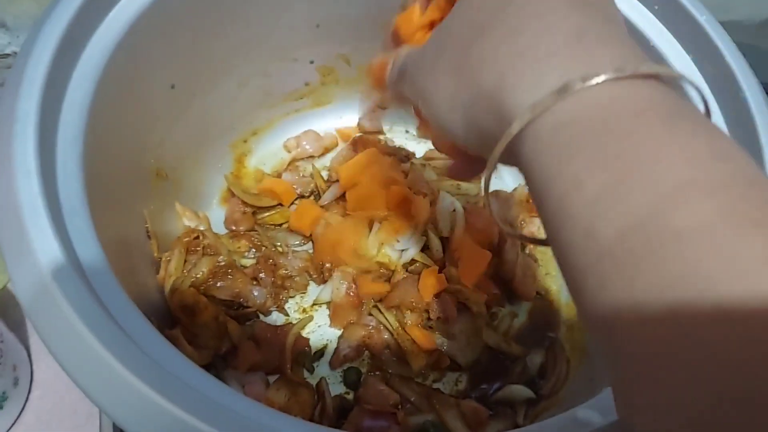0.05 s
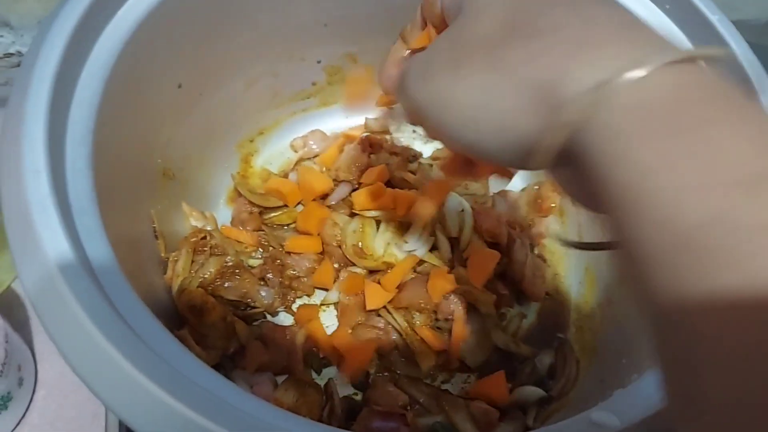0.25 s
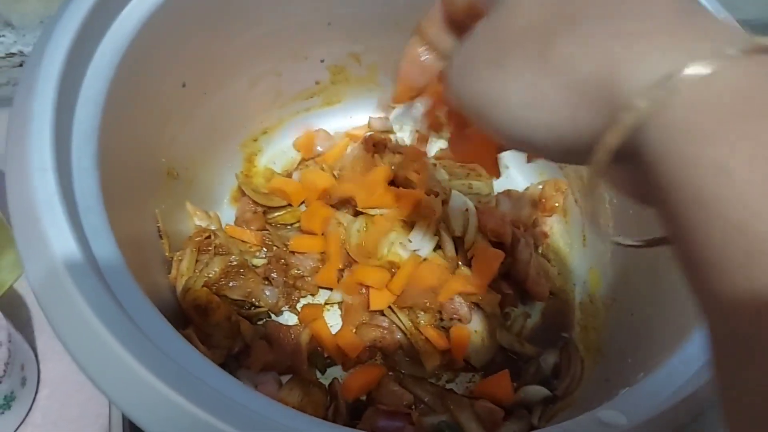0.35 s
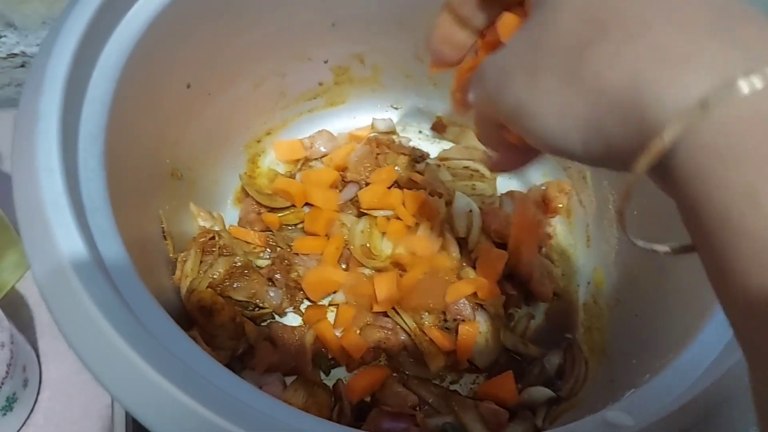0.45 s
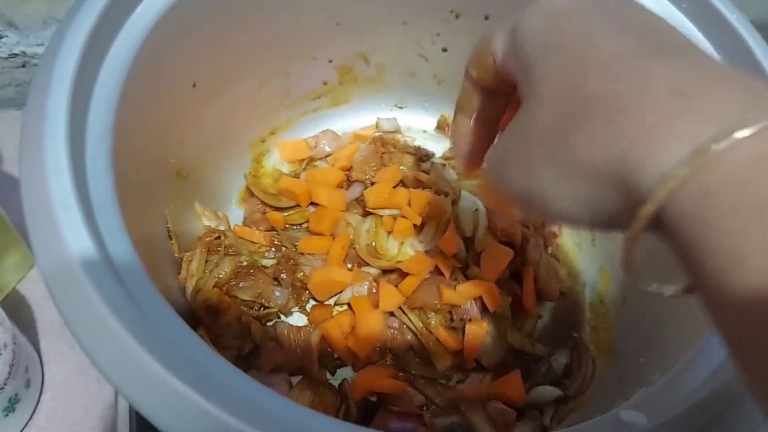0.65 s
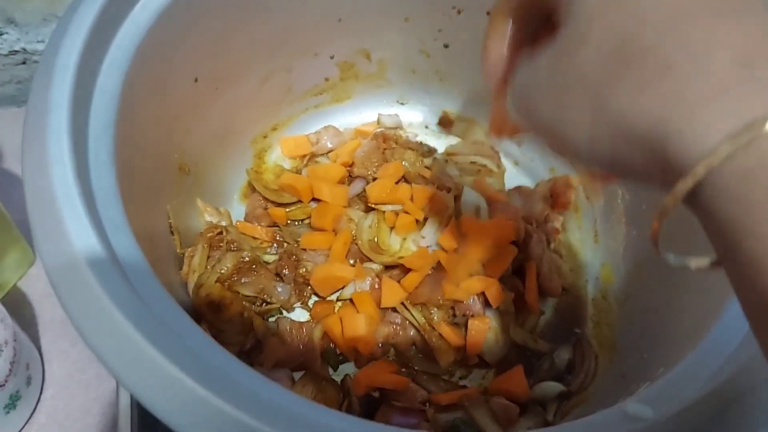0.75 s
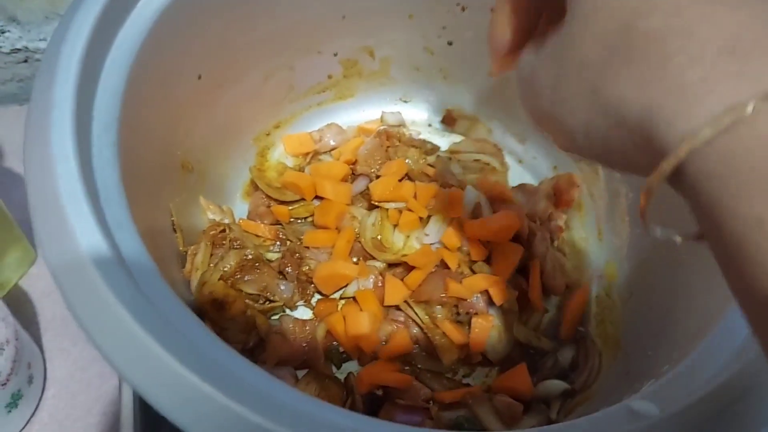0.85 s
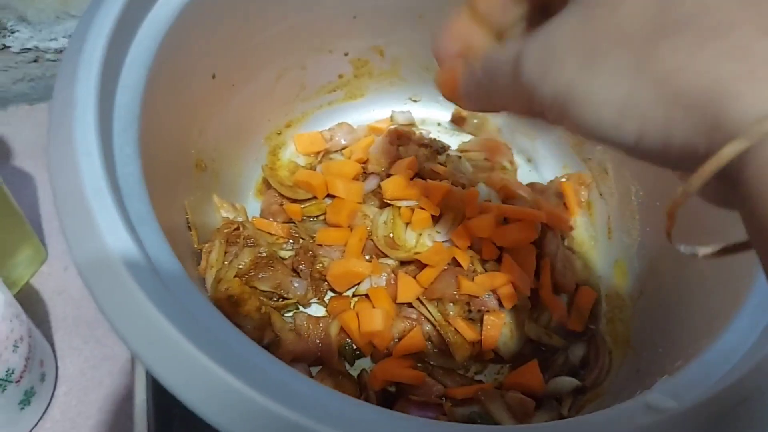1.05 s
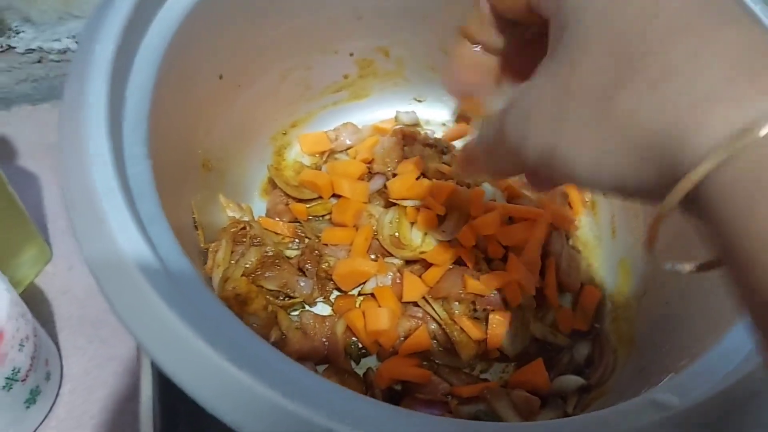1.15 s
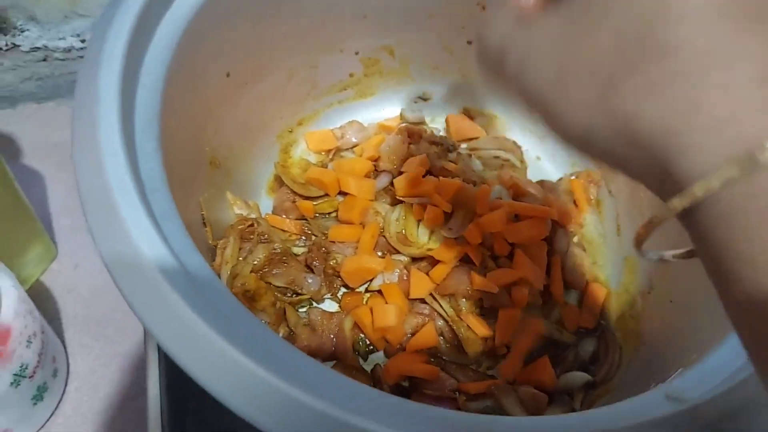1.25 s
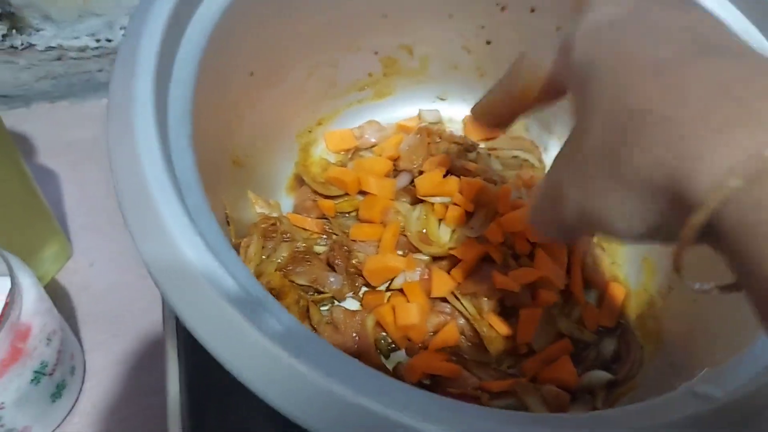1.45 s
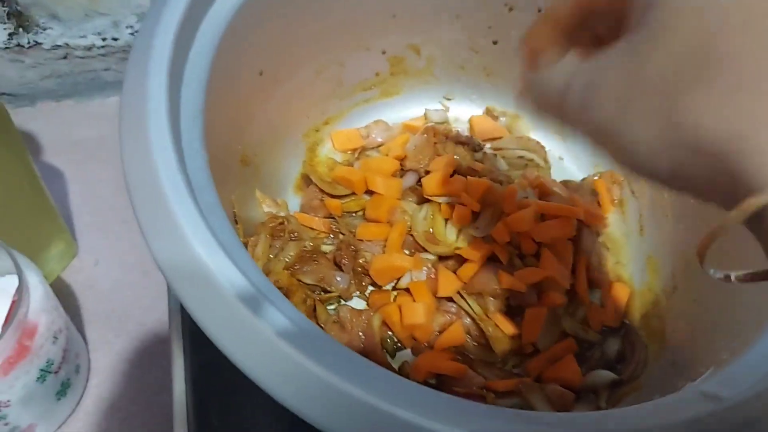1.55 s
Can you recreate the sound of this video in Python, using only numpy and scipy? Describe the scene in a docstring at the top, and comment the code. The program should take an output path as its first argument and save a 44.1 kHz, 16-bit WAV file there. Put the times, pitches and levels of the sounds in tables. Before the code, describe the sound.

Dull, damp thuds and taps come in quick clusters as carrot pieces drop into a metal cooking pot, heard from just above. Faint wet crackle and a low kitchen hum lie underneath, and a thin bangle clink follows.

```python
"""Carrot pieces fall from a hand onto onions and meat in a metal cooking pot, in a small kitchen. Each landing
is a dull thud of the pile and pot floor that rings the pot wall, with a wet smack on top. The damp pieces
crackle and tick in the fingers, tiny wet bubbles pop with a squeak, and two thin pings sound among the
landings. A thin bangle clinks once against the pot at the end; a motor hums in the background throughout."""
import sys
import numpy as np
from scipy import signal
from scipy.fft import rfft, irfft
from scipy.io import wavfile
from scipy.ndimage import uniform_filter1d

SR = 44100
rng = np.random.default_rng(int(sys.argv[2]) if len(sys.argv) > 2 else 0)


def materialize(psi):
    """Save the field psi as 16-bit PCM at rate SR to the path in sys.argv[1].

    A 1-D psi becomes a single channel; in a 2-D psi each row is a channel.
    """
    bounded = np.clip(np.atleast_2d(psi).T, -1, 1)
    quanta = np.round(bounded * 32767).astype(np.int16)
    wavfile.write(sys.argv[1], SR, quanta)


N = 70560
T = np.arange(N) / SR
HZ = np.maximum(np.fft.rfftfreq(N, 1 / SR), 1)


def from_db(db):
    """Decibels to gain."""
    return 10 ** (np.asarray(db) / 20)


def rms_one(x):
    """Scale to unit rms."""
    return x / np.sqrt(np.mean(x ** 2) + 1e-20)


def pan(db):
    """Left and right gains; positive dB leans left."""
    return from_db([[db / 2], [-db / 2]])


def over_hz(points):
    """A curve of straight lines over log frequency."""
    hz, value = np.transpose(points)
    return np.interp(np.log(HZ), np.log(hz), value)


def eq(points):
    """Gain at each frequency along an EQ curve."""
    return from_db(over_hz(points))


def fader(points):
    """Gain at each moment along a level ride."""
    return from_db(np.interp(T, *np.transpose(points)))


def decay(start, t60):
    """An envelope that jumps to 1 and dies away."""
    return (T >= start) * from_db(-60 * np.clip((T - start) / t60, 0, 10))


def noise(colour):
    """Coloured mono noise of unit rms."""
    return rms_one(irfft(rfft(rng.standard_normal(N)) * colour, N))


def drift(rate_hz):
    """A random wobble, rolled off above the given rate."""
    return noise(1 / (1 + (HZ / rate_hz) ** 4))


def convolve(x, response):
    """Play a sound through an impulse response."""
    return signal.fftconvolve(np.atleast_2d(x), np.atleast_2d(response), axes=1)[:, :N]


# Stereo image of diffuse sound: (frequency [Hz], left-right correlation [-1 to 1])
STEREO_IMAGE = [(30, -0.11), (80, 0.65), (160, .9), (330, .8), (550, 0.44), (1000, -0.52), (3000, 0.11),
                (15000, -0.75)]

def stereo_noise(colour):
    """Diffuse noise, narrow in the upper bass and low mids, wide in the treble."""
    mid, side = rfft(rng.standard_normal((2, N))) * colour
    alike = over_hz(STEREO_IMAGE)
    return rms_one(irfft(np.sqrt(1 + alike) * mid + np.sqrt(1 - alike) * side * [[1], [-1]], N))


# Level ride of the motor: (time [s], level [dB])
HUM_RIDE = [(0.0, -58), (0.056, -51), (0.132, -57.5), (0.298, -51), (0.346, -59.5), (0.426, -53),
            (0.958, -58.5), (1.202, -51.5), (1.488, -60), (1.6, -53.5)]

def motor_hum(hz=160.6, waver_hz=1.85):
    """A motor drones on one low tone that wavers in pitch and level."""
    phase = 2 * np.pi * np.cumsum(hz + waver_hz * drift(13)) / SR
    return pan(-1.7) * np.sqrt(2) * fader(HUM_RIDE) * np.sin(phase)


# Colour of the room tone: (frequency [Hz], relative level [dB])
ROOM_TONE_EQ = [(25, -10.5), (50, -5), (85, -0.5), (125, 1), (220, -7), (450, -8), (1000, -23),
                (1800, -37.5), (3200, -34.5), (6000, -34), (10000, -44), (15500, -43)]

def room_tone():
    """A steady, bass-heavy bed of noise."""
    return from_db(-58) * stereo_noise(eq(ROOM_TONE_EQ))


# Colour of the damp crackle: (frequency [Hz], relative level [dB])
CRACKLE_EQ = [(1800, -3.5), (3600, -3), (5500, -11), (7500, -5), (10000, -12), (12000, -10), (15500, -2)]
# Level ride of the crackle: (time [s], level [dB])
CRACKLE_RIDE = [(0, -67.5), (.13, -73.5), (.27, -66.5), (.42, -69), (.58, -65.5), (.7, -78), (.92, -79.5),
                (1.0, -72.5), (1.08, -75), (1.3, -78.5), (1.6, -83.5)]

def crackle(grains_per_s=700, spread_db=3.5, t60=.015):
    """Damp pieces crackle in the fingers: a fine spray of tiny noise grains."""
    onsets = rng.random(N) < grains_per_s / SR
    strengths = from_db(spread_db * np.minimum(rng.exponential(1, N), 4))
    envelope = rms_one(convolve(onsets * strengths, decay(0, t60))[0])
    return noise(eq(CRACKLE_EQ)) * envelope * fader(CRACKLE_RIDE)


def strike_db(hz, thump_db, knock_db):
    """How hard a landing drives a mode: the lows take its thump level, the highs its knock level."""
    crossfade = np.interp(np.log(hz), np.log([548, 1026]), [0, 1])
    return (1 - crossfade) * thump_db + crossfade * knock_db


def body_band(x):
    """Pile and pot radiate neither deep bass nor treble."""
    return signal.sosfilt(signal.butter(2, [235, 1675], "band", fs=SR, output="sos"), x + 1e-18)


MODE_SPREAD_DB = 1.5  # random change in a mode's level from hit to hit
# Carrot hits, also cueing the wall ring and the smacks:
# (time [s], thump level [dB], knock level [dB], smack level [dB], knock pitch [ratio])
HITS = [(0.041, -30, -52.5, -58.5, 0.94), (0.17, -50, -52, -59.5, 0.97), (0.2293, -16, -12.5, -41, 1.015),
        (.249, -32, -35, -67, 1.07), (0.262, -31.5, -34, -72, 1.01), (0.2862, -30.5, -37, -57.5, 1.05),
        (.296, -36.5, -33.5, -63, 1), (.321, -46.5, -36.5, -64, 1.053), (0.387, -37, -43, -53.5, 1.072),
        (0.445, -38, -52.5, -66, 0.97), (0.508, -40, -37, -62, 1.036), (.531, -47.5, -45.5, -47, 1.14),
        (0.5467, -42.5, -37, -61, 1.02), (0.631, -41.5, -51, -63, 0.97),
        (0.7623, -29.5, -36.5, -52.5, 1.08), (0.7803, -32, -34, -60, 1.03), (.796, -44, -53.5, -58, 1.04),
        (.858, -49.5, -51.5, -60.5, 1), (0.9735, -44, -56, -58.5, 1.01), (.986, -47, -51.5, -63.5, 0.97),
        (1.151, -22, -38, -46.5, 0.892), (1.175, -33.5, -50, -67, 0.91), (1.217, -48, -58, -82, 0.91),
        (1.2633, -29.5, -31, -51, 1.026), (1.281, -38, -55, -59.5, 0.97), (1.3363, -38.5, -40.5, -55, 1.01),
        (1.4107, -49, -45.5, -69, 0.98)]
# Damped modes of pile and pot floor: (frequency at pitch 1 [Hz], relative level [dB], t60 [s])
KNOCK_MODES = [(274, -19.5, 0.084), (382.7, -9, 0.045), (450.6, -2, 0.046), (532, -2.5, 0.041),
               (712, 0.5, .018), (1032, 0, 0.024), (1530, -11, 0.015), (1666, -10.5, 0.014)]

def knocks(length_s=.2, echo_delay_s=.004, echo_t60=.16, echo_db=-6.5):
    """Each piece lands on its own spot, with its own pitch; returns the knocks and their in-pot echo."""
    t = T[T < length_s]
    hz, db, t60 = np.transpose(KNOCK_MODES)[:, :, None]
    signs = (-1) ** np.arange(len(hz))[:, None]
    direct, echo = np.zeros(N + len(t)), np.zeros((2, N + len(t)))
    for s, thump_db, knock_db, _, pitch in HITS:
        scatter_db = MODE_SPREAD_DB * rng.standard_normal(hz.shape)
        gains = signs * from_db(db - .5 + strike_db(hz, thump_db, knock_db) + scatter_db)
        knock = np.sum(gains * from_db(-60 * t / t60) * np.cos(2 * np.pi * hz * pitch * t), axis=0)
        walls = rng.standard_normal(len(t)) + rng.standard_normal((2, len(t)))  # centre plus width
        walls = rms_one(walls * (t >= echo_delay_s) * from_db(-60 * t / echo_t60)) / np.sqrt(len(t))
        span = slice(int(s * SR), int(s * SR) + len(t))
        direct[span] += knock
        echo[:, span] += convolve(knock, walls)[:, :len(t)]
    return body_band(direct[:N]), from_db(echo_db) * body_band(echo[:, :N])


def ring(force, hz, t60):
    """A resonator: each click sets off a dying tone of the same height."""
    r, w = from_db(-60 / (t60 * SR)), 2 * np.pi * hz / SR
    return signal.lfilter([1, -r * np.cos(w)], [1, -2 * r * np.cos(w), r * r], force + 1e-18)


# Modes of the metal pot wall: (frequency [Hz], relative level [dB], t60 [s])
WALL_MODES = [(262, -27, .35), (328, -26, .35), (405, -13, .25), (457, -12, .24), (490, -16, .27),
              (549, -15, .3), (575, -18, .3), (678, -17, .27), (715, -19, .27), (742, -19, .25),
              (822, -17, .23), (992, -21, .2), (1014, -21, .22), (1044, -17, .26), (1155, -28, .3),
              (1398, -33, .3), (1525, -30, .3), (1676, -32, .25), (2090, -29, .25), (2190, -30, .2)]

def pot_wall():
    """Every landing rings the wall's modes, each with a strength and polarity that vary by spot."""
    s, thump_db, knock_db, _, _ = np.transpose(HITS)
    wall = 0
    for hz, db, t60 in WALL_MODES:
        scatter, polarity = rng.standard_normal((len(s), 2)).T
        drive_db = db + strike_db(hz, thump_db, knock_db) + MODE_SPREAD_DB * scatter
        force = np.zeros(N)
        force[(s * SR).astype(int)] = np.sign(polarity) * from_db(drive_db)
        wall = wall + ring(force, hz, t60)
    return body_band(wall)


def kitchen_reverb(x, t60, predelay_s=.007):
    """Diffuse reflections off close walls, at unit energy and even in colour."""
    spectrum = rfft(stereo_noise(1) * decay(predelay_s, t60))
    colour = np.sqrt(uniform_filter1d(np.mean(abs(spectrum) ** 2, axis=0), size=80))
    tail = irfft(spectrum / colour, N) * (T >= predelay_s) * (T < t60)
    return convolve(x, rms_one(tail) / np.sqrt(N))


def thuds(right_lag_s=.00016):
    """The body of the landings: knocks, their reflections in pot and room, and a faint wall ring."""
    knock, pot_echo = knocks()
    reflections = pot_echo + from_db(-9) * kitchen_reverb(knock, t60=.45)
    left = knock + from_db(-4.5) * pot_wall()
    right = np.interp(T - right_lag_s, T, left)
    return pan(2) * (np.array([left, right]) + reflections)


# Colour of a wet smack: (frequency [Hz], relative level [dB])
SMACK_EQ = [(1500, 4.5), (2200, 5), (3600, 4.5), (4400, -6), (5400, -0.5), (7300, -4), (10000, -16.5),
            (15500, -14)]

def smacks(t60=.024):
    """Wet surfaces meet: a bright splash of noise on each landing."""
    return noise(eq(SMACK_EQ)) * sum(from_db(db) * decay(s, t60) for s, _, _, db, _ in HITS)


# Damp pieces parting from the skin: (time [s], level [dB], centre frequency [Hz])
TICK_CUES = [(0.199, -60, 5950), (0.246, -56.5, 9000), (0.317, -58.5, 6950), (0.367, -60, 12100),
             (0.417, -61.5, 3200), (.478, -62, 12010), (0.5034, -48, 12700), (0.5332, -55, 3600),
             (0.558, -68, 6000), (.975, -53, 3700), (0.9851, -52, 10800), (1.076, -53.5, 2100),
             (1.08, -64, 6000), (1.095, -63.5, 13000), (1.471, -64.5, 5850)]

def tick(s, db, hz, width_oct=.6, t60=.014):
    """A wet film snaps: a very short burst around one broad peak."""
    colour = 1 / (1 + (np.log2(HZ / hz) / width_oct) ** 2)
    return from_db(db) * decay(s, t60) * noise(colour)


# Small wet squeaks: (time [s], level [dB], pitch [Hz])
SQUEAK_CUES = [(0.201, -56, 3010), (0.216, -49, 2650), (0.924, -57.5, 3030), (.946, -52, 3110),
               (1.125, -53.5, 2770), (1.346, -45.5, 2916)]

def squeak(s, db, hz, attack_s=.0013, t60=.022, jitter=.11):
    """Tiny wet bubbles pop with a squeak: a very short, unsteady tone with one overtone."""
    phase = 2 * np.pi * np.cumsum(hz * (1 + jitter * drift(1470))) / SR
    envelope = decay(s, t60) * np.clip((T - s) / attack_s, 0, 1)
    return from_db(db) * envelope * (np.sin(phase) + .15 * np.sin(2 * phase))


def wet_sounds():
    """The wet layer, well to the left: smacks, ticks and crackle feed the reverb, squeaks skip it."""
    wet = smacks() + sum(tick(*cue) for cue in TICK_CUES) + crackle()
    squeaks = sum(squeak(*cue) for cue in SQUEAK_CUES)
    return pan(12) * (wet + squeaks) + pan(5.8) * from_db(-2) * kitchen_reverb(wet, t60=.3)


# Thin pings among the landings: (time [s], level [dB], pitch [Hz], t60 [s])
PING_CUES = [(.509, -62.5, 2060, .18), (0.9761, -58.5, 3650, 0.065)]

def pings():
    """Two faint, pure tones that die quickly."""
    tones = sum(from_db(db) * decay(s, t60) * np.sin(2 * np.pi * hz * T) for s, db, hz, t60 in PING_CUES)
    return pan(10) * tones


# Modes of the bangle against the pot: (frequency [Hz], relative level [dB], t60 [s])
BANGLE_MODES = [(2340, -15, .8), (2449, -8, .9), (2478, -17, .8), (3671, -14, .2), (4606, -3, .55),
                (4745, 0, .4), (4795, 0, .2), (4883, -2, .2), (5014, 1, .35), (5227, -3, .3),
                (5771, -7, .4), (6365, -3, .45), (6590, -1, .25), (6726, -1, .18), (6857, 0, .18),
                (7137, 0, .18), (7621, -3, .17), (8194, -1, .3), (8796, -4, .3), (10860, -9, .17),
                (12170, -11, .2), (13520, -14, .25), (15100, -11, .25)]
# Attack of its dense upper modes: (frequency [Hz], relative level [dB])
CLASH_EQ = [(1500, -43), (3800, -41), (5000, -4), (5900, -19), (7100, 0.5), (9000, -14), (11500, -22.5),
            (15500, -28)]
# Their lingering tail: (frequency [Hz], relative level [dB])
SHIMMER_EQ = [(1000, -44), (1450, 2), (1900, -9), (2450, -1.5), (3100, -6.5), (5100, 3.5), (6000, -12),
              (7200, -14.5), (10000, -5), (15000, -22)]

def bangle(s=1.5212):
    """Metal taps metal: a short bright clash, then long tones in a shimmer of weaker ones."""
    tones = 0
    for hz, db, t60 in BANGLE_MODES:
        phase = 2 * np.pi * (hz * T + rng.random((2, 1)) / 2)  # each side has its own offset, for width
        tones = tones + from_db(db) * decay(s, t60) * np.sin(phase)
    clash = from_db(-34) * stereo_noise(eq(CLASH_EQ)) * decay(s, t60=.061)
    shimmer = from_db(-57.5) * stereo_noise(eq(SHIMMER_EQ)) * decay(s, t60=1)
    clink = from_db(-53) * tones + clash + shimmer
    return pan(4) * (clink + from_db(-12.5) * kitchen_reverb(clink, t60=.3))


def scene():
    """The full mix, heard from above the pot."""
    return thuds() + wet_sounds() + pings() + bangle() + motor_hum() + room_tone()


def record(dry, cutoff_hz=15800):
    """A steep high cut on the mix."""
    return signal.sosfilt(signal.ellip(12, .1, 80, cutoff_hz, fs=SR, output="sos"), dry)


dry = scene()
out = record(dry)
materialize(out)
```